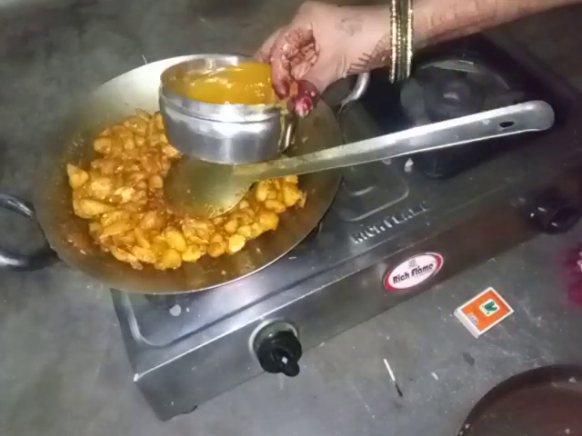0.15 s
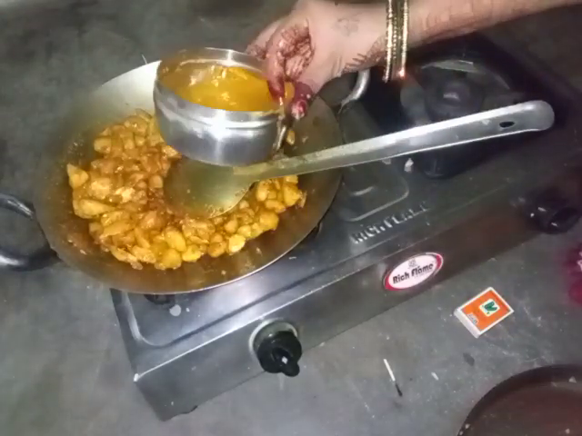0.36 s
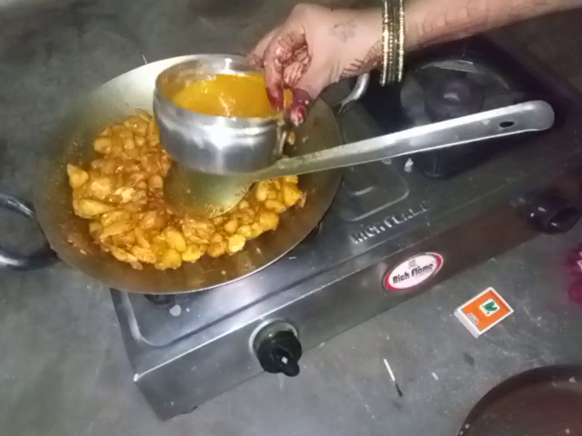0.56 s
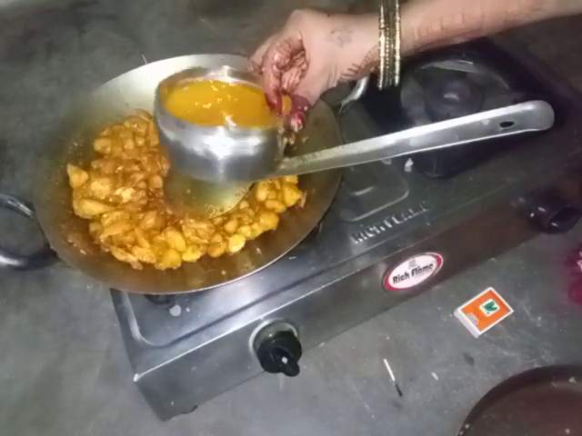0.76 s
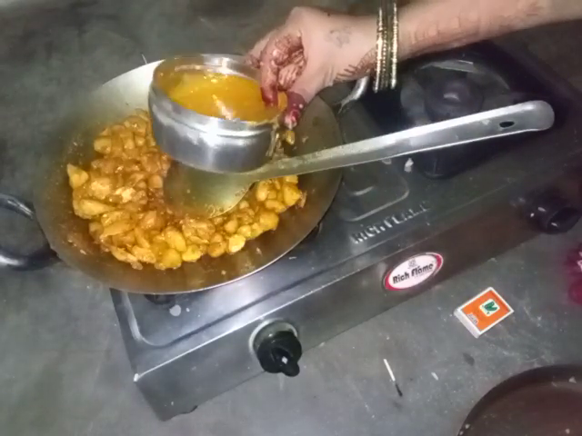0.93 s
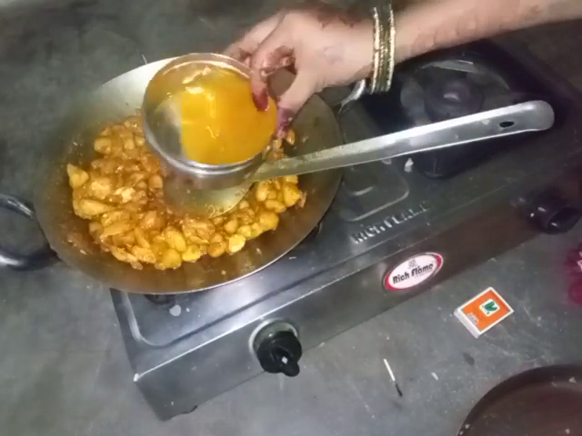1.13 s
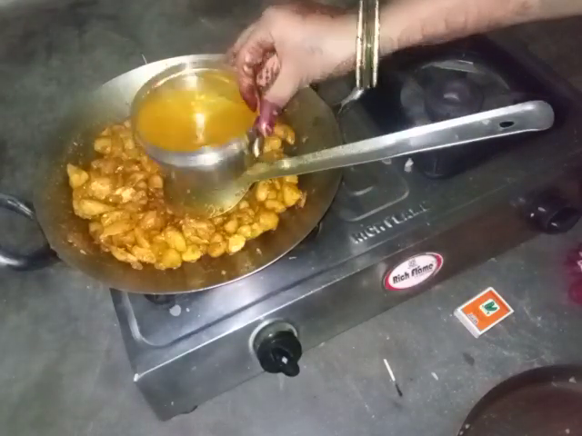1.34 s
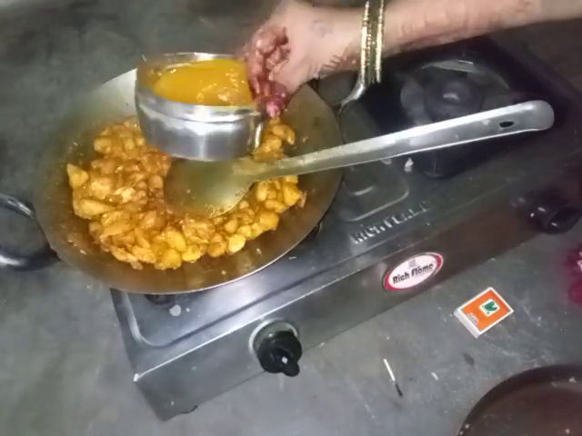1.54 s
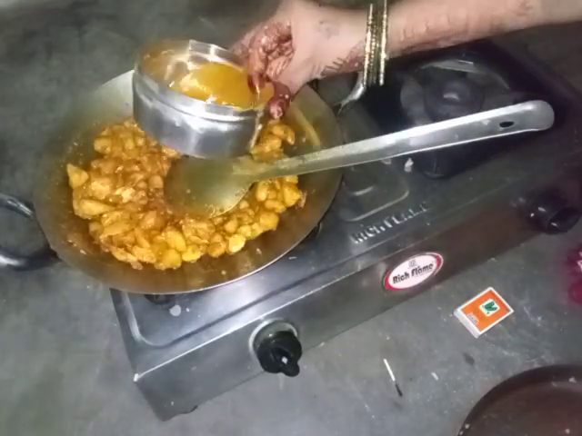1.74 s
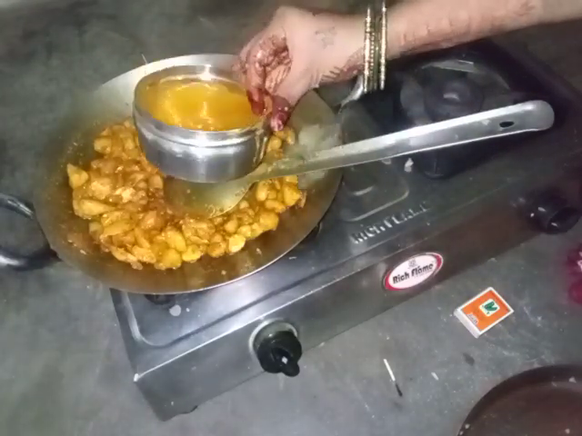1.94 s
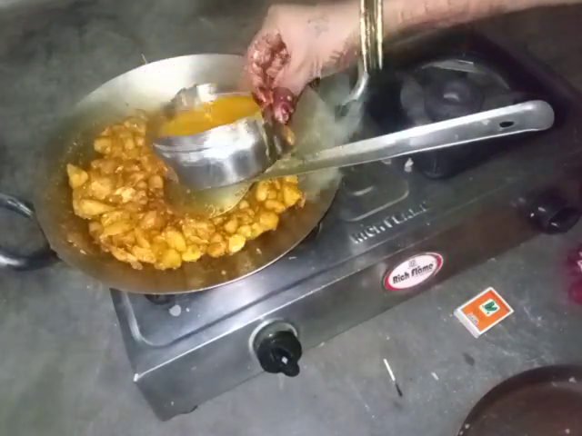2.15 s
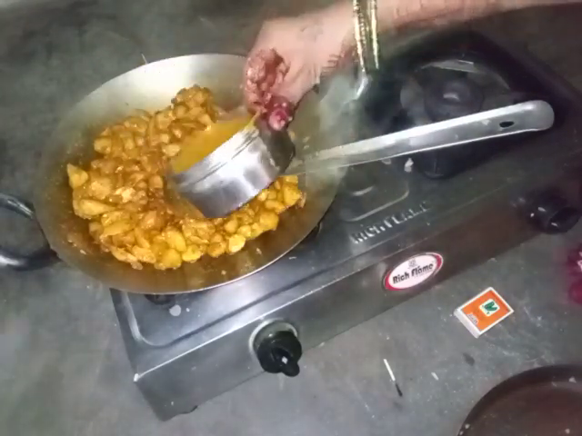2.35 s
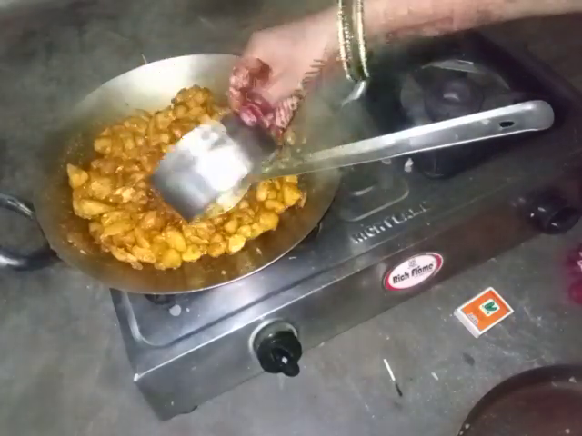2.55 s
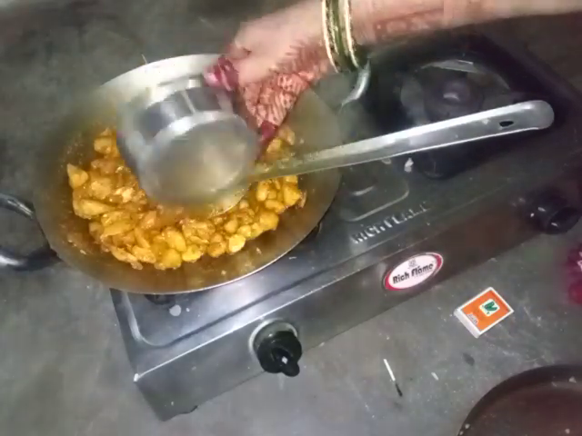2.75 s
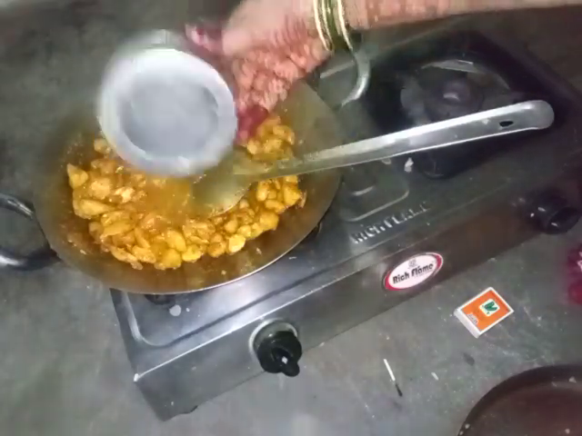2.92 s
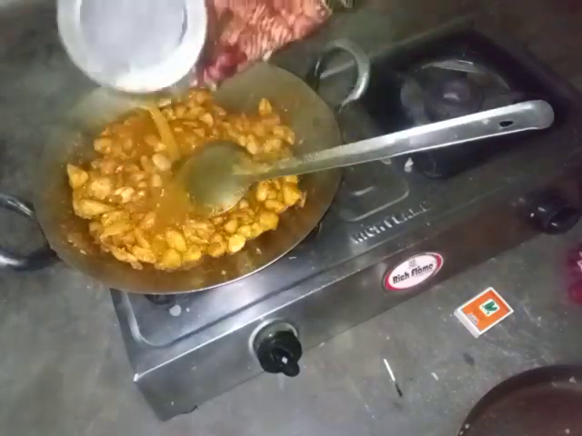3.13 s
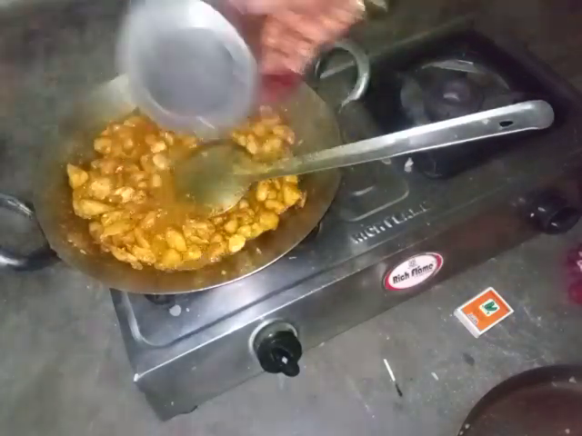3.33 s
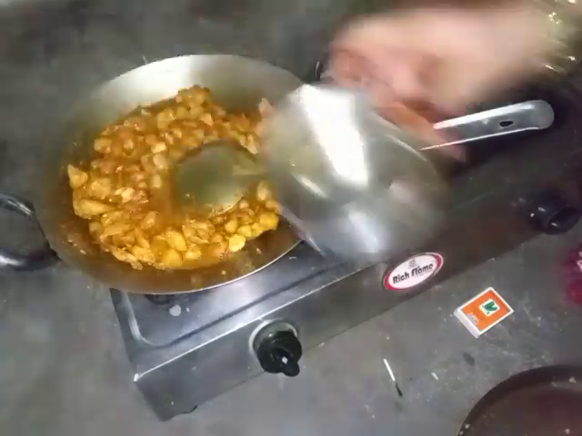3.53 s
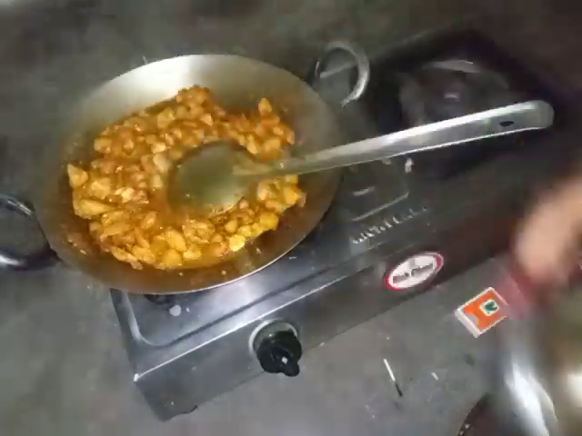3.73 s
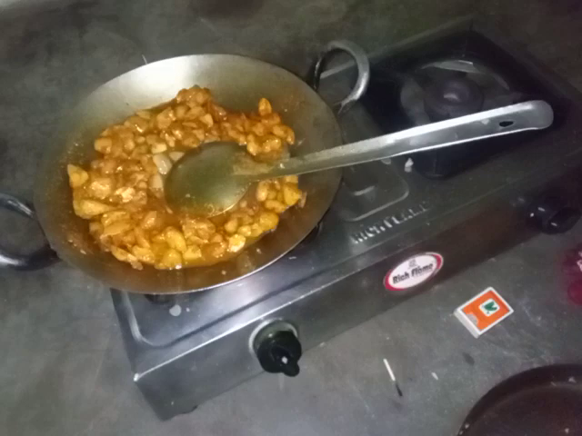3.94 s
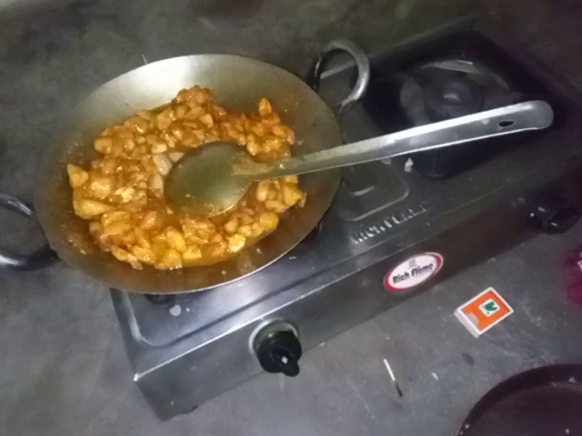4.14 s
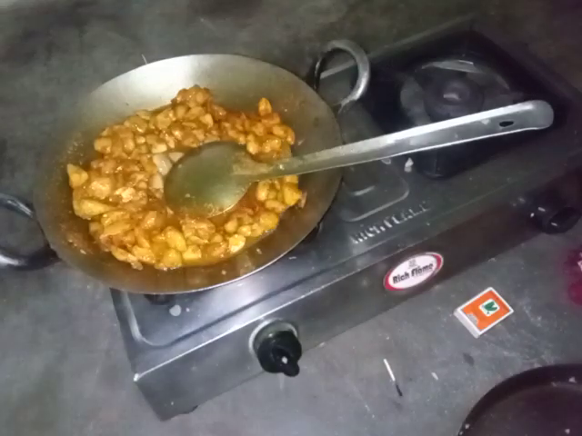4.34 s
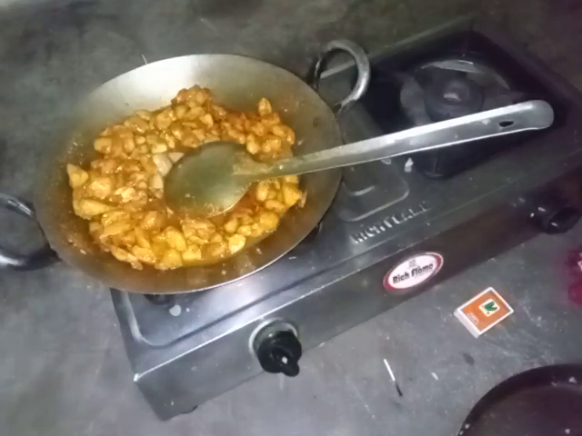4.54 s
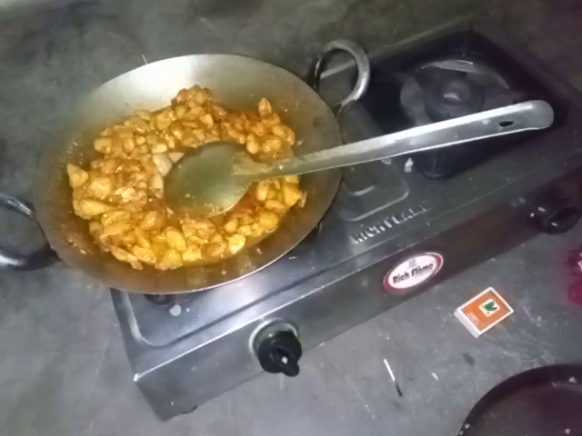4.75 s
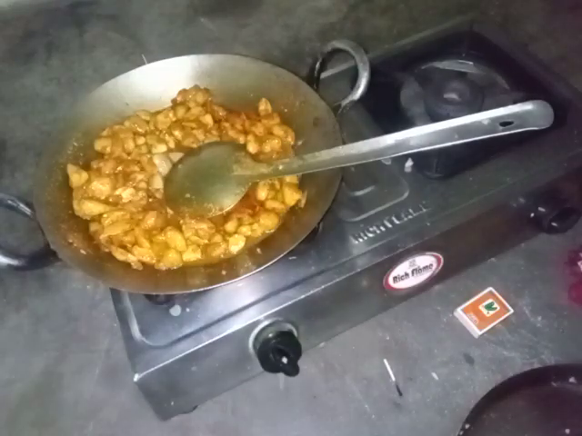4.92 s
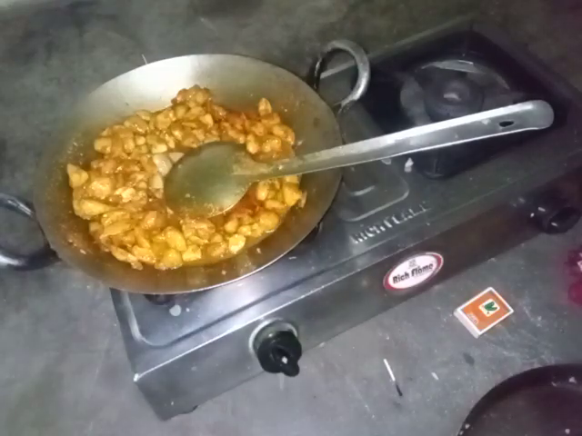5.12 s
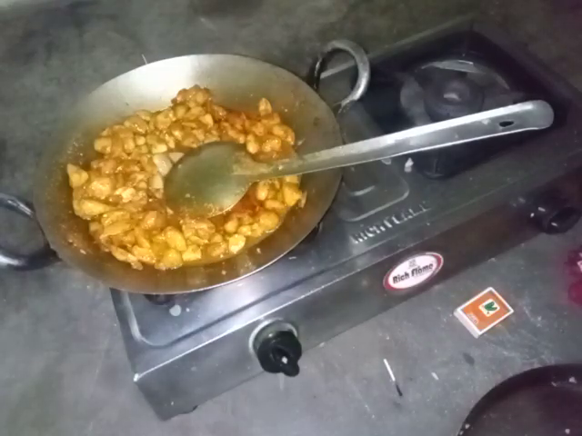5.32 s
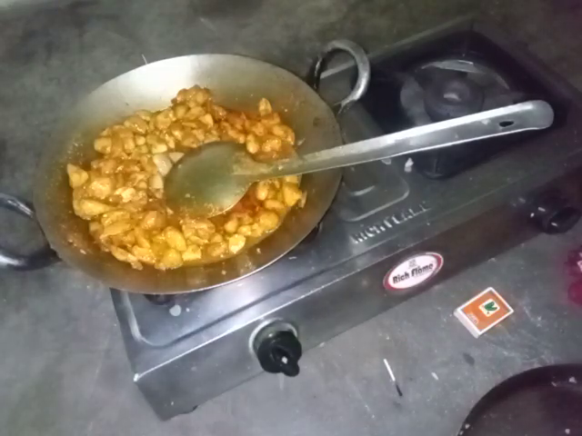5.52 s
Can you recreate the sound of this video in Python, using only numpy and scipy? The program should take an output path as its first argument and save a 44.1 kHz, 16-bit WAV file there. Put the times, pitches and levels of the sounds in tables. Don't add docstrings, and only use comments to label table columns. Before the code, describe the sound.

Steady sizzle in a metal pan surges into bubbling, spitting steam when liquid goes in, eases, then a dull metal bowl knock on stone.

```python
import sys
import numpy as np
from scipy import signal
from scipy.fft import rfft, irfft
from scipy.io import wavfile

SR = 44100
rng = np.random.default_rng(int(sys.argv[2]) if len(sys.argv) > 2 else 0)


def log_audio(samples):
    frames = np.atleast_2d(samples).T
    limited = np.clip(frames, -1, 1)
    pcm = np.round(limited * 32767).astype(np.int16)
    wavfile.write(sys.argv[1], SR, pcm)


def attenuation_scalar(level_db):
    decades = np.asarray(level_db, float) / 20
    return 10 ** decades


N = 246078

# (frequency [Hz], level per Hz [dB])
ROOM_COLOUR = [(12, -46), (20, -12), (55, -6.5), (210, -1), (315, -7.5), (393, 0.5), (507, -6.5),
               (558, -2.5), (900, -0.5), (1170, -1.5), (1980, -120)]
# (time [s], level [dB])
ROOM_LEVEL = [(0.0, -71), (1.75, -71.5), (2.04, -70), (2.59, -71.5), (2.73, -69.5), (4.16, -65.5),
              (4.54, -65), (5.58, -67)]
# (frequency [Hz], rms level [dB])
BURNER_HUM = [(248, -82), (301, -90.5), (403, -81.5)]
# (time of the top [s], level [dB], centre [Hz], length [s])
RUMBLES = [(0.0, -68, 141.4, 0.12), (0.204, -52.5, 133, 0.13), (1.155, -64, 145.3, 0.1),
           (2.304, -71.5, 189.6, .4), (2.63, -61.5, 145, 0.13), (2.968, -77, 159, .1),
           (3.37, -73.5, 157, 0.22), (3.64, -67.5, 150, 0.22), (4.006, -72, 145.7, 0.14),
           (4.403, -74, 128, .12), (4.713, -60, 156.5, 0.079), (4.754, -55, 150, 0.1),
           (4.884, -58.5, 112, 0.25), (5.0, -62, 114.5, 0.14), (5.075, -63, 173.5, 0.066),
           (5.38, -68, 148.7, 0.16)]
# (time of the top [s], frequency [Hz], rms level [dB], swell [s], fade [s])
THUMPS = [(.125, 258, -63, .04, .035), (2.6, 290, -64, .03, .05), (2.61, 200, -67, .03, .05),
          (2.99, 2756, -50, .03, .06), (3.47, 1195, -56, .06, .03), (3.78, 72, -71, .04, .05),
          (3.97, 75, -74, .03, .04), (4.325, 405, -61, .025, .025), (4.44, 1290, -52, .048, .037),
          (1.2, 75, -70, .04, .05), (.38, 125, -70, .04, .04), (1.93, 195, -70, .04, .04),
          (2.68, 80, -72, .03, .03), (4.6, 590, -65, .03, .04), (4.82, 575, -69, .04, .05),
          (4.49, 1290, -57, .012, .01), (4.555, 1290, -62, .025, .025), (4.61, 690, -64, .04, .05)]
# (time [s], peak level [dB])
BOWL_KNOCKS = [
    (4.3775, -25),
    (4.6978, -37.5),
]
# (frequency [Hz], level [dB], time to fall 60 dB [s])
BOWL_MODES = [(595, 6.5, 0.17), (522, 5.5, 0.04), (480, -9, 0.35), (450, -8, 0.034), (402, -12.5, 0.15),
              (646, -15, 0.27), (90.2, -24, 0.13)]
# (time [s], peak level [dB])
DROPLETS = [(0.1516, -38.5), (0.2319, -43), (0.8046, -42), (1.1568, -37), (1.4885, -32), (1.6287, -41),
            (1.7709, -41), (1.925, -35), (1.961, -25), (1.9954, -28), (2.1181, -34), (2.1914, -35),
            (2.2692, -39), (2.4224, -39), (2.8315, -30), (3.0385, -39), (3.1422, -38), (3.243, -32),
            (3.3867, -38), (3.7454, -39), (4.1594, -41), (4.1932, -37), (4.7511, -34)]
# (time [s], centre [Hz], rms level [dB], time to fall 60 dB [s])
POPS = [(.535, 3300, -50, .05), (1.005, 2200, -56, .08), (1.165, 1800, -52, 0.07), (1.345, 1000, -52, .15),
        (1.385, 1300, -58, .1), (1.674, 1870, -51, .08), (1.764, 1595, -56, .06), (2.328, 4300, -43, 0.074),
        (2.364, 5000, -48, .05), (2.385, 5500, -41, .1), (2.575, 1390, -50, 0.11), (3.048, 3900, -52, 0.22),
        (4.09, 4300, -47, .04), (4.12, 4200, -44, .04), (4.385, 1310, -56, 0.42), (4.385, 2400, -52, 0.092),
        (5.2476, 8000, -40, 0.011), (2.409, 5000, -46, 0.17)]
# (time [s], peak level [dB], centre [Hz])
FAT_SPITS = [(0.1165, -22, 6370), (0.1526, -28, 9470), (0.2155, -26, 8790), (0.3239, -27, 8530),
             (0.3317, -26, 8270), (0.3714, -25, 9040), (0.4833, -25, 8700), (0.6586, -28, 9650),
             (0.7179, -27, 4650), (0.7331, -27, 6030), (0.8492, -24, 9040), (0.9008, -27, 6290),
             (1.0076, -24, 8610), (1.1277, -28, 9220), (1.2105, -28, 5860), (1.2293, -24, 8610),
             (1.4283, -26, 8700), (1.4556, -25, 9040), (1.5164, -26, 8790), (1.5698, -28, 8700),
             (1.6929, -26, 4480), (1.7005, -27, 8790), (1.7399, -26, 9220), (1.8283, -28, 7490),
             (1.8953, -25, 9130), (2.5222, -22, 8530), (2.6171, -21, 6980), (2.8085, -22, 6630),
             (2.8548, -24, 8960), (3.0518, -23, 3960), (3.2836, -22, 6030), (3.5237, -25, 8610),
             (3.5764, -25, 7840), (3.6816, -23, 5510), (3.7908, -25, 5680), (3.9695, -21, 6720),
             (3.9929, -26, 5340), (4.0933, -26, 8270), (4.1208, -27, 8440), (4.2411, -25, 8870),
             (4.387, -24, 8530), (4.6593, -26, 8870), (4.8061, -26, 9040), (4.9119, -26, 9390),
             (4.9388, -26, 8270), (5.0015, -26, 5770), (5.0582, -29, 7840), (5.1557, -28, 9300),
             (5.1737, -28, 8530), (5.2468, -21, 8440), (5.3706, -28, 8530), (5.3839, -28, 8960),
             (5.4787, -29, 9040),
             (1.9174, -27, 9170), (2.0264, -24, 6240), (2.2134, -24, 5120), (2.2634, -21, 5240),
                (2.3274, -22, 3800), (2.3634, -22, 5450), (2.3854, -22, 6040), (2.4454, -22, 5080)]
PAN_NOTES = [587, 689, 770, 888, 996, 1093, 1190, 1260, 1443, 1585, 1850, 2190, 2400, 2573, 2756, 3130,
             3408, 3800, 3980, 4250, 4387, 4570, 4740, 5152, 5300, 5660, 5980, 6234, 6600, 7700]
# (time of the top [s], frequency [Hz], rms level [dB], length [s])
GURGLES = [(.52, 691, -61, 0.093), (1.173, 1620, -51, 0.02), (1.37, 970, -58.5, 0.073),
           (1.39, 1217, -48, 0.03), (1.771, 1540, -51, 0.018), (2.009, 1560, -50, 0.016),
           (2.183, 1543, -52, 0.057), (2.252, 1445, -56, .066), (2.299, 887, -49, 0.022),
           (2.31, 990, -57.5, 0.099), (2.461, 882, -54, 0.071), (2.41, 987, -58.5, 0.076),
           (2.566, 592, -51, 0.063), (2.589, 1650, -49.5, 0.046), (2.595, 1040, -48.5, 0.063),
           (2.676, 635, -55, 0.069), (2.81, 683, -57, 0.22), (2.82, 1162, -49.5, 0.093),
           (2.83, 1010, -55, .06), (2.908, 1800, -44.5, 0.025), (2.93, 882, -51.5, 0.11),
           (3.02, 1096, -57, 0.092), (2.98, 684, -57.5, 0.14), (3.2, 1087, -51, 0.04),
           (3.27, 680, -57, 0.14), (3.27, 1276, -47, 0.1), (3.355, 1268, -48.5, 0.048),
           (3.325, 1404, -52, 0.033), (3.41, 1185, -55, .06), (3.365, 1080, -53, 0.069),
           (3.445, 893, -52, 0.043), (3.475, 1440, -48, 0.051), (3.538, 886, -56, 0.047),
           (4.405, 1713, -55, 0.041), (4.737, 1905, -60, 0.091)]
WHISTLES = [(.017, 2910, -47.5, 0.065), (.545, 3230, -47.5, 0.027), (.96, 4450, -46, 0.06),
            (1.018, 2370, -48, 0.05), (1.277, 2580, -48, 0.034), (1.376, 3290, -52, 0.066),
            (1.718, 3920, -58, 0.1), (1.955, 5960, -45, 0.055), (2.015, 4430, -44.5, 0.078),
            (2.015, 6200, -44, 0.16), (2.035, 3400, -49, 0.087), (2.188, 2390, -51, 0.06),
            (2.252, 4480, -42, 0.046), (2.28, 5760, -44.5, 0.12), (2.275, 5200, -35, 0.03),
            (2.31, 5105, -31, 0.026), (2.24, 5040, -42, 0.034), (2.38, 4400, -43, .05),
            (2.39, 6060, -41.5, 0.093), (2.47, 5980, -45, 0.12), (2.54, 6120, -42, 0.072),
            (2.58, 2525, -52, 0.085), (2.595, 3979, -43.5, 0.046), (2.62, 5300, -36, 0.031),
            (2.995, 2190, -50, 0.084), (3.08, 4210, -43.5, 0.078), (3.095, 2755, -40, 0.064),
            (3.06, 2735, -44, 0.04), (3.305, 6200, -36, 0.028), (3.815, 7000, -41.5, .05),
            (4.79, 3830, -49.5, 0.043), (5.114, 5680, -48, 0.055)]
SPLASHES = [(1.95, 3800, -48, 0.056), (2.07, 4740, -47, 0.058), (2.19, 5140, -43, 0.091),
            (2.34, 3805, -38, 0.023), (2.34, 4450, -37, 0.027), (2.385, 5350, -39, 0.046),
            (2.21, 5300, -53, .05), (2.45, 5120, -36, 0.028), (2.47, 4220, -43, 0.035),
            (4.4, 2490, -54.5, 0.046)]
FAINT_NOTES = [(0.167, 2390, -53.5, 0.061), (0.305, 2000, -53, 0.06), (0.34, 3500, -59, 0.047),
               (0.431, 1900, -55, 0.033), (0.557, 2000, -65, 0.041), (1.003, 1860, -62, 0.038),
               (1.12, 900, -60.5, 0.093), (3.43, 1350, -48, 0.018), (1.395, 2004, -53, 0.067),
               (1.518, 2830, -50, 0.051), (1.692, 1490, -60, 0.049), (1.692, 2350, -62, 0.041),
               (1.766, 1186, -60, 0.059), (1.804, 1830, -58, 0.038), (1.995, 565, -62, 0.053),
               (1.997, 1070, -60, 0.049), (2.007, 2420, -51, 0.042), (2.026, 3370, -56, 0.076),
               (2.13, 2190, -53, 0.058), (2.135, 595, -59, 0.065), (2.143, 3140, -45.5, 0.061),
               (2.186, 680, -58.5, 0.041), (2.254, 1094, -54, 0.038), (2.261, 2130, -51, 0.053),
               (2.307, 2890, -44, 0.037), (2.432, 1590, -61, 0.035), (2.469, 740, -58, 0.054),
               (2.589, 3150, -44, 0.032), (2.63, 1620, -62, 0.035), (2.656, 2280, -59, 0.035),
               (2.66, 1144, -51, 0.029), (2.707, 1003, -51.5, 0.065), (2.831, 3110, -45, 0.04),
               (3.093, 3000, -44, 0.038), (3.094, 560, -57.5, 0.041), (3.114, 3460, -44, 0.065),
               (3.149, 2430, -44.5, 0.047), (3.23, 2710, -46, 0.061), (3.268, 3490, -40.5, 0.03),
               (3.274, 2760, -45, 0.064), (3.423, 2426, -49, 0.05), (3.663, 2090, -53, 0.062),
               (0.015, 3730, -48, 0.034), (0.035, 4930, -47, 0.041), (0.116, 6180, -44, 0.038),
         (0.193, 3980, -53, 0.036), (0.23, 6600, -41, 0.038), (0.46, 4240, -55, 0.05),
         (0.73, 5940, -47, 0.047), (0.803, 4350, -52, 0.061), (0.893, 5120, -48, 0.056),
         (0.991, 4540, -48, 0.036), (1.39, 4570, -47, 0.047), (1.705, 4380, -47, 0.066),
         (1.713, 4000, -55, 0.073), (2.08, 5920, -49, 0.046), (2.503, 5950, -53, 0.056),
         (2.602, 4410, -47, 0.032), (2.79, 6700, -38, 0.035), (3.073, 3770, -44, 0.071),
         (3.08, 5540, -44, 0.049), (3.271, 4540, -55, 0.064), (3.304, 5660, -47, 0.044),
         (3.41, 5120, -50, 0.025), (3.634, 4590, -42, 0.038), (3.766, 5600, -41, 0.047),
         (3.896, 5790, -39, 0.046), (4.394, 7820, -45, 0.047), (4.58, 5700, -44, 0.041),
         (4.593, 6220, -41, 0.038), (4.751, 3790, -46, 0.029), (4.789, 5660, -45, 0.035),
         (4.842, 5700, -46, 0.041), (5.111, 5210, -48, 0.071), (5.283, 5990, -50, 0.036),
         (5.376, 5230, -52, 0.047), (5.401, 4910, -51, 0.042)]
REGISTER_HZ = [2900, 5200, 8500, 13500]
BOIL_SHARE = [0.46, 0.98, 0.92, 1.18]
# (time [s], level [dB])
BOIL = [(0.0, -43), (0.4, -42), (0.7, -43.5), (1.3, -43), (1.62, -43.5), (1.89, -43.5), (1.95, -40),
        (2.3, -38.0), (2.75, -38), (3.05, -39.0), (3.2, -38), (3.45, -37.5), (3.58, -41), (4.1, -41.5),
        (4.3, -44.5), (4.9, -43.5), (5.48, -45), (5.58, -48)]
# (time of the top [s], lift [dB], centre [Hz], fade [s])
FLASHES = [(.52, 2.5, 2893, 0.26), (.8, 2.5, 8485, .06), (.94, 2.5, 5200, .06), (1.3, 1.5, 2898, 0.12),
           (1.38, 3, 5200, .03), (1.5, 1.5, 13200, 0.058), (1.72, 3, 5200, .03), (1.721, 2.5, 2910, 0.067),
           (1.94, 7.5, 13460, .08), (1.98, 3, 5200, .25), (2.3, 4.5, 5200, .14), (2.6, 5, 2900, 0.15),
           (2.921, 3, 2897, .15), (3.08, 2.5, 3979, .03), (3.3, 3, 5766, .03), (3.68, 3, 5200, .12),
           (3.8, 2.5, 6996, .16), (3.95, 1.5, 6306, .12), (4.18, 2.5, 13770, 0.3), (4.26, 2, 8543, .03),
           (4.4, 2.5, 8472, .03), (4.599, 2, 5200, .12), (4.6, 1.5, 13260, .25), (5.301, 3.5, 2899, 0.089),
           (5.36, 4.5, 13220, 0.16)]
# (frequency [Hz], level per Hz [dB])
HISS_COLOUR = [(200, -51), (320, -32.5), (600, -20.5), (1300, -11.5), (2700, -4.5), (5000, 1.5), (7500, 3),
               (8900, 6.5), (10560, 0.5), (10640, -6), (12000, -10.5), (13900, -12.5), (15200, -2),
               (15800, 1)]


def rms_one(x):
    return x / np.sqrt(np.mean(x ** 2) + 1e-20)


def in_time(rows):
    s, *columns = np.transpose(rows)
    return np.array([np.interp(np.arange(N) / SR, s, c) for c in columns])


def drift(rate):
    r = np.exp(-40 * np.pi * rate / SR)
    noise = rng.standard_normal(N // 20 + 3002)
    slow = signal.lfilter([1], [1, -2 * r, r * r], noise)[3000:]
    return np.interp(np.arange(N) / 20, np.arange(len(slow)), rms_one(slow))


def ring(clicks, hz, t60):
    r, w = attenuation_scalar(-60 / (t60 * SR)), 2 * np.pi * hz / SR
    return signal.lfilter([0, np.sin(w)], [1, -2 * r * np.cos(w), r * r], clicks + 1e-18)


def dying(clicks, t60):
    return signal.lfilter([1], [1, -attenuation_scalar(-60 / (t60 * SR))], clicks) * rng.standard_normal(N)


def coloured(x, points):
    hz = np.fft.rfftfreq(N, 1 / SR) + 1e-3
    point_hz, point_db = np.transpose(points)
    gain_db = np.interp(np.log(hz), np.log(point_hz), point_db, left=-90, right=-90)
    return rfft(x) * attenuation_scalar(gain_db), hz


def octave_band(x, low_hz, high_hz):
    return signal.sosfilt(signal.butter(2, [low_hz, high_hz], "band", fs=SR, output="sos"), x)


def sung(rows, waver, flutter_db=3.5):
    out, level_drift, pitch_drift = np.zeros(N), drift(70), drift(40)
    for k, (top, hz, level_db, swell, fade) in enumerate(rows):
        at = np.arange(max(round((top - swell) * SR), 0), min(round((top + fade) * SR), N))
        t = at / SR - top
        arch = np.cos(np.pi / 2 * np.where(t < 0, t / swell, t / fade)).clip(0, 1)
        shape = arch ** np.where(t < 0, .3, .6)
        flutter_at = (at * (1 + int(hz / 2000)) + 7919 * k) % N
        flutter = rms_one(attenuation_scalar(flutter_db * level_drift[flutter_at]))
        bend = waver * pitch_drift[(at + 7919 * k) % N]
        out[at] += attenuation_scalar(level_db + 1) * flutter * shape * np.sin(2 * np.pi * hz * t + bend + k)
    return out


def rumble_course():
    floor_db, edge_db = -86.5, 16
    t, (top, db, hz, length) = np.arange(N) / SR, np.transpose(RUMBLES)
    slopes = [d - 2 * edge_db * np.abs(t - s) / span for s, d, span in zip(top, db, length)]
    level_db = np.maximum(np.max(slopes, axis=0), floor_db + 4 * drift(5.5))
    return level_db, np.interp(t, top, hz)


def room():
    noise = irfft(coloured(rng.standard_normal(N), ROOM_COLOUR)[0], N)
    tone = attenuation_scalar(in_time(ROOM_LEVEL)[0] + 0.5) * rms_one(noise)
    hum = sum(attenuation_scalar(db) * rms_one(ring(rng.standard_normal(N), hz, 0.7)) for hz, db in BURNER_HUM)
    rumble_db, centre_hz = rumble_course()
    phase = 2 * np.pi * np.cumsum(centre_hz) / SR
    lumps = (1.9 + drift(35)) * np.sin(phase) + drift(40) * np.cos(phase)
    return tone + hum + attenuation_scalar(rumble_db) * rms_one(lumps) + sung(THUMPS, waver=0.21)


def bowl():
    still_s = 0.096
    (first_s, _), (second_s, _) = BOWL_KNOCKS
    contact = np.zeros(N)
    for s, db in BOWL_KNOCKS:
        contact[round(s * SR)] = attenuation_scalar(db)
    contact += attenuation_scalar(-30) * dying(contact, .22)
    out = sum((-1) ** k * attenuation_scalar(db) * ring(contact, hz, t60) for k, (hz, db, t60) in enumerate(BOWL_MODES))
    t = np.arange(N) / SR
    since = t - np.where(t < second_s, first_s, second_s - .05)
    out = out * np.clip((still_s + .015 - since) / 0.013, .15, 1)
    return ring(out, 482, 0.016) * attenuation_scalar(-42.5)


def droplets():
    s, db = np.transpose(DROPLETS)
    clicks = np.zeros(N)
    clicks[(s * SR).astype(int)] = attenuation_scalar(db - 14)
    return ring(dying(clicks, 0.039), 15400, .003)


def pops():
    out, t = np.zeros(N), np.arange(6000) / SR
    for s, hz, level_db, t60 in POPS:
        spray = rng.standard_normal(len(t)) * rng.exponential(1, len(t))
        spray = rms_one(octave_band(spray, hz * 2 ** -.5, hz * 2 ** .5))
        out[round(s * SR):][:len(t)] += attenuation_scalar(level_db - 60 * t / t60) * spray
    return out


def spits():
    rise_s = .0002
    out, t = np.zeros(N), np.arange(130) / SR
    shape = t / rise_s * np.exp(1 - t / rise_s)
    for s, peak_db, hz in FAT_SPITS:
        at = round((s - rise_s) * SR)
        wavelet = np.sin(2 * np.pi * hz * t) + 0.47 * np.sin(2 * np.pi * 0.72 * hz * t)
        out[at:at + len(t)] += (attenuation_scalar(peak_db - 2.5) * shape * wavelet)[:N - at]
    return octave_band(out, 3000, 13000)


def singing(rows, longer=1, extra_db=0):
    swell = 0.48 * longer
    fade = (1 - 0.48) * longer
    notes = [(s, hz, db + extra_db, swell * length, fade * length) for s, hz, db, length in rows]
    return sung(notes, waver=0.9)


def register_db(swell_db, hz):
    place = np.interp(np.log(hz), np.log(REGISTER_HZ), np.arange(4))
    low = min(int(place), 2)
    return swell_db[low] + (place - low) * (swell_db[low + 1] - swell_db[low])


def vigour():
    rise_s, width_octaves = .05, .5
    pour_end_s, drowned_db = 4, -1.9
    t, boil_db = np.arange(N) / SR, in_time(BOIL)[0]
    swell_db = np.outer(BOIL_SHARE, boil_db)
    for top, lift_db, hz, fade in FLASHES:
        reach = np.exp(-(np.log2(np.array(REGISTER_HZ) / hz) / width_octaves) ** 2)
        shape = np.clip(np.minimum(1 + (t - top) / rise_s, 1 - (t - top) / (2 * fade)), 0, 1)
        swell_db += lift_db * np.outer(reach, shape)
    swell_db[0] += drowned_db * np.clip((t - pour_end_s) / 0.045, 0, 1)
    return swell_db - swell_db.mean(axis=1, keepdims=True)


def pan_modes(swell_db, count, over_db, spread_db, length):
    chance = rng.random((count, 6))
    busy = np.cumsum(attenuation_scalar(1.5 * swell_db[1]))
    at = np.searchsorted(busy, chance[:, 0] * busy[-1]).clip(0, N - 1)
    strong = np.array(PAN_NOTES)[(chance[:, 1] * len(PAN_NOTES)).astype(int)]
    weak = 500 + 9500 * chance[:, 1] ** 2
    hz = np.where(chance[:, 2] < .3, strong, weak)
    colour_hz, colour_db = np.transpose(HISS_COLOUR)
    level_db = np.interp(np.log(hz), np.log(colour_hz), colour_db) + over_db
    level_db -= spread_db * np.log(1 - .95 * chance[:, 3])
    level_db += [register_db(swell_db[:, i], f) for i, f in zip(at, hz)]
    swell, fade = length * (.3 + chance[:, 4]), length * (.5 + 1.5 * chance[:, 5])
    return sung(np.c_[at / SR, hz, level_db, swell, fade], waver=0.12)


def grains(per_s, spread_db):
    sizes = attenuation_scalar(spread_db * np.minimum(rng.exponential(1, N), 3.9)) * rng.choice([-1, 1], N)
    return rms_one(sizes * (rng.random(N) < per_s / SR))


def frying(swell_db, crackle, together_db, near_db, own_db):
    clumps = attenuation_scalar(3 * drift(45))
    wide = grains(1500 * clumps, spread_db=4.0)
    spectra = []
    for per_s, spread_db in ((3115, 3.8), (2600, 2.4), (500, 4)):
        swarm = .5 * wide + 0.62 * grains(per_s * clumps, spread_db)
        mix = np.sqrt(1 - crackle) * rng.standard_normal(N) + np.sqrt(crackle) * swarm
        spectra.append(coloured(mix, HISS_COLOUR))
    out, together, near = np.zeros(N), drift(22), [drift(14) for k in range(7)]
    for k, centre in enumerate(250 * 2 ** (np.arange(19) / 3)):
        spectrum, hz = spectra[int(centre > 5500) + int(centre > 11000)]
        share = np.cos(np.pi / 2 * np.clip(3 * np.log2(hz / centre), -1, 1)) ** 1.5
        own = own_db * (1 + 1.7 * (centre > 11000)) * drift(16.0)
        flicker_db = together_db * together + near_db * near[k // 3] + own
        out += attenuation_scalar(register_db(swell_db, centre) + flicker_db) * irfft(spectrum * share, N)
    return attenuation_scalar(-39.5) * rms_one(out)


def scene():
    swell_db = vigour()
    hiss_db = swell_db - .35 * np.maximum(swell_db - 3, 0) * [[1], [1], [0], [0]]
    pan = frying(hiss_db, crackle=0.61, together_db=0.52, near_db=0.5, own_db=0.34)
    pan = pan + pan_modes(swell_db, count=2400, over_db=-58.5, spread_db=1.9, length=.024)
    pan = pan + singing(GURGLES) + singing(WHISTLES) + singing(SPLASHES)
    pan = pan + singing(FAINT_NOTES, longer=1.2, extra_db=-3.5)
    pan = pan + spits() + droplets() + pops()
    return np.tile(pan + bowl() + room(), (2, 1))


def band_limit(x):
    return signal.sosfilt(signal.butter(12, 17060, fs=SR, output="sos"), x)


def record(dry):
    low_pass = signal.ellip(12, .3, 70, 15745, fs=SR, output="sos")
    return band_limit(signal.sosfilt(low_pass, dry))


dry = scene()
out = record(dry)
log_audio(out)
```